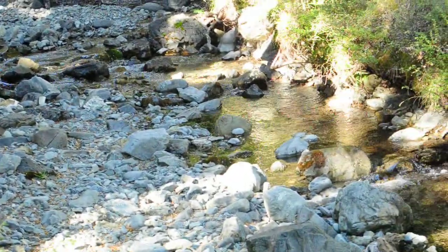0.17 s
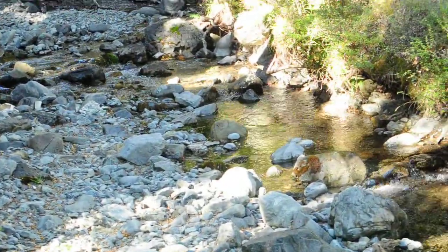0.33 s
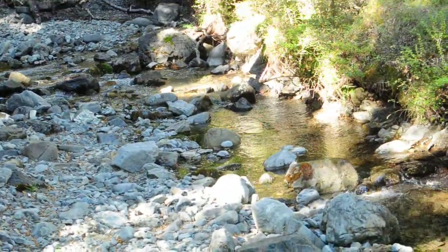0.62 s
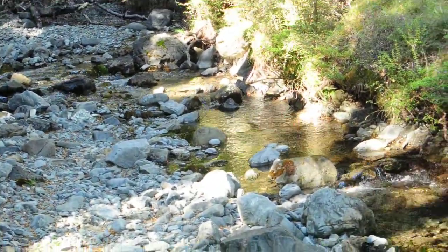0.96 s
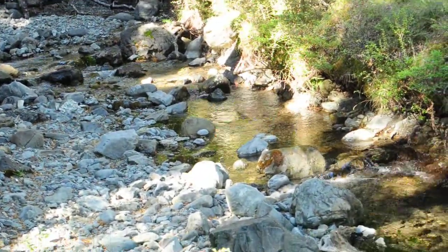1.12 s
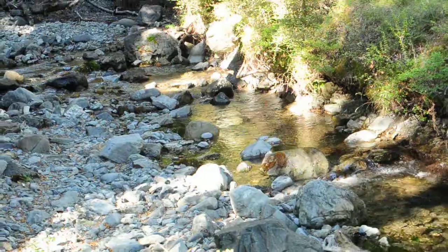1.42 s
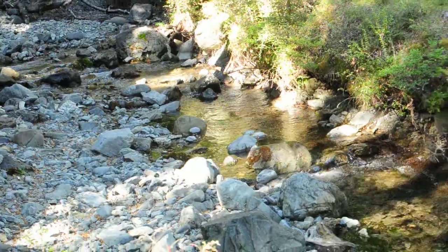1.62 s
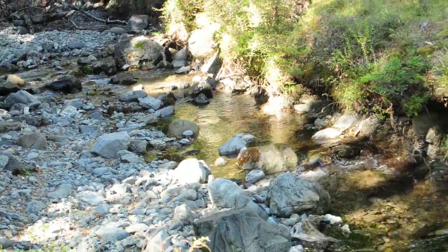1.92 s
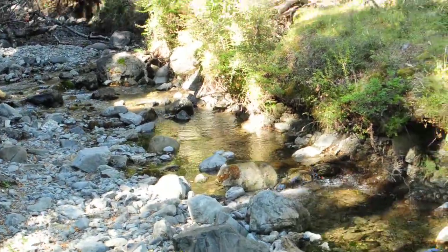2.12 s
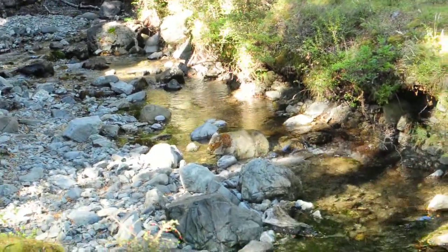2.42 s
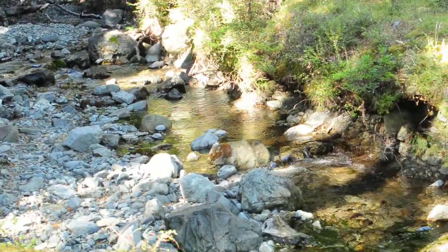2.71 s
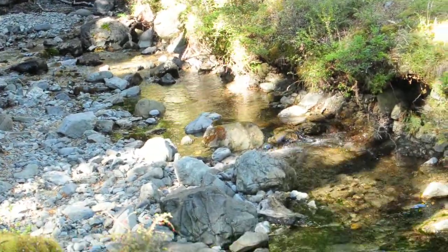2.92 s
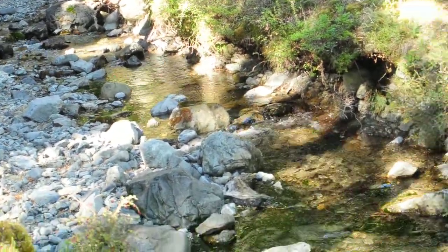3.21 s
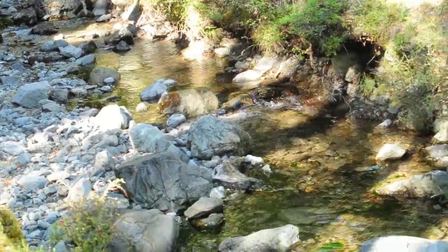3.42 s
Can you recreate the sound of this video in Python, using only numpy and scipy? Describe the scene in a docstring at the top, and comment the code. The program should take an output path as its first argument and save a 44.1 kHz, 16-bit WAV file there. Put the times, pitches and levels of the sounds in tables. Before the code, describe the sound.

Water babbles over rocks outdoors, bubbling and plopping, with a faint handling click midway.

```python
"""A shallow stream runs over stones, a few metres away, in the open air.
From the start, flickering bands of noise and swarms of tiny ringing bubbles merge into a rush.
Almost at once nearer drops plop and hollow pockets glug, as dying tones with short echoes.
Soon splashes swell the water round one pitch, and a first soft bump of the hand is felt.
Midway comes a second bump with one sharp plastic click, a ringing casing; a third bump follows."""
import sys
import numpy as np
from scipy import signal
from scipy.fft import rfft, irfft, next_fast_len
from scipy.io import wavfile

SR = 44100
rng = np.random.default_rng(int(sys.argv[2]) if len(sys.argv) > 2 else 0)


def output_pcm(signal):
    """Save a mono or channel-first signal as 16-bit PCM at the path in sys.argv[1].

    Samples are clipped to [-1, 1] before scaling.
    """
    pcm = np.clip(np.atleast_2d(signal).T, -1, 1) * 32767
    wavfile.write(sys.argv[1], SR, np.round(pcm).astype(np.int16))


N = 156996  # length of the scene in samples


def from_db(db):
    """Turn decibels into a plain multiplier."""
    return 10 ** (np.asarray(db) / 20)


def rms_one(x):
    """Scale to an average power of 1."""
    return x / np.sqrt(np.mean(x ** 2) + 1e-20)


def add(out, start_s, sound):
    """Mix a sound in, starting at a given time."""
    i = int(max(start_s, 0) * SR)
    out[i:i + len(sound)] += sound[:max(N - i, 0)]


def drift(corner_hz):
    """Random motion with a spread of 1; changes faster than the corner are smoothed away."""
    step = 40  # samples between the points of the curve
    r = np.exp(-2 * np.pi * corner_hz * step / SR)
    noise = rng.standard_normal(N // step + 2002)
    slow = signal.lfilter([1], [1, -2 * r, r * r], noise)[2000:]  # skip the filter's start
    return np.interp(np.arange(N) / step, np.arange(len(slow)), rms_one(slow))


def colour(x, points):
    """Filter to a given spectrum, never sounding ahead of time; white noise keeps its power."""
    size = next_fast_len(2 * N, True)
    hz, db = np.transpose(points)
    log_hz = np.log(np.fft.rfftfreq(size, 1 / SR) + 1)
    gain = rms_one(from_db(np.interp(log_hz, np.log(hz), db)))
    # folding the cepstrum forward in time gives the minimum-phase filter
    cepstrum = irfft(np.log(gain), size)
    cepstrum[1:size // 2] *= 2
    cepstrum[size // 2 + 1:] = 0
    return irfft(rfft(x, size) * np.exp(rfft(cepstrum)), size)[:N]


def ring(clicks, hz, t60):
    """A resonance: each unit click starts a sine of height 1 that fades by 60 dB in t60 seconds."""
    r, w = from_db(-60 / (t60 * SR)), 2 * np.pi * hz / SR
    return signal.lfilter([0, np.sin(w)], [1, -2 * r * np.cos(w), r * r], clicks + 1e-18)


def pulses(rows, rise, attack_cycles):
    """Single dying tones; over its life each glides in pitch by the fraction "rise"."""
    out = np.zeros(N)
    for start_s, hz, db, cycles in rows:
        age = np.arange(int(SR * cycles / hz)) * hz / SR  # in cycles
        attack = 1 - np.exp(-age / attack_cycles)
        decay = from_db(db - 60 * age / cycles)
        tone = np.sin(2 * np.pi * age * (1 + rise * age / cycles / 2))
        add(out, start_s, attack * decay * tone)
    return out


SURGE_DB, SURGE_HZ = 0.53, 74  # spread and corner of the flutter


def flow_db(hz, surge):
    """All pitches flutter together, and each splash lifts the pitches near its own."""
    return SURGE_DB * surge + splash_swell_db(hz)


RUSH_DB, RUSH_FLICKER_DB = -37.5, 1.0  # level before colouring, spread of the flicker
CLUMP_HZ = 31  # corner of the flicker, in the rush and in the bubble strengths


def rush(surge):
    """Far water: countless sounds blur into half-octave bands of noise, each with its own flicker."""
    edges = 20 * 2 ** np.arange(0, 10.1, .5)
    white = rng.standard_normal((2, N))  # neighbouring bands take different noise
    out = 0
    for k, (low, high) in enumerate(zip(edges, edges[1:])):
        sos = signal.butter(2, [low, high], "band", fs=SR, output="sos")
        band = signal.sosfilt(sos, white[k % 2])
        flicker_db = RUSH_FLICKER_DB * drift(CLUMP_HZ)
        out = out + band * from_db(flow_db(np.sqrt(low * high), surge) + flicker_db)
    return from_db(RUSH_DB) * rms_one(out)


LARGEST = 3.16  # cap on bubble strength, in spreads
CLUMP_DB = 1.75  # spread of the shared rise and fall in strength
BIRTH_CYCLES = 3.4  # length of a bubble's brief swell as it pinches off
BUBBLES_DB = 0.17  # lifts all the swarms against the rush
# swarms of bubbles: lowest f/Hz, highest f/Hz, births per s, cycles to fade by 60 dB,
# spread of strengths/dB, level/dB (per unit of bandwidth, before colouring)
BUBBLE_SWARMS = [(130, 691, 240, 8.8, 0.5, -39), (639, 1515, 400, 19.4, 1.5, -37),
                 (1413, 3360, 750, 24.4, 2.5, -36), (3376, 8650, 1700, 20.3, 3, -35),
                 (8440, 16400, 5300, 35, 4.5, -34)]


def swarm(surge, low_hz, high_hz, per_s, cycles, spread_db, level_db, count=24):
    """Air bubbles of random strength ring briefly, each at one of a set of pitches."""
    strength_db = spread_db * np.minimum(rng.exponential(1, N), LARGEST) + CLUMP_DB * drift(CLUMP_HZ)
    strengths = from_db(strength_db) * rng.choice([-1, 1], N)
    births = strengths * (rng.random(N) < per_s / SR)
    pitch_number = rng.integers(0, count, N)
    edges = np.geomspace(low_hz, high_hz, count + 1)
    out = 0
    for k, (low, width) in enumerate(zip(edges, np.diff(edges))):
        hz = low + width / 2
        tones = ring(births * (pitch_number == k), hz, cycles / hz)
        tones = ring(tones, hz, BIRTH_CYCLES / hz)  # the second ring softens the start
        out = out + np.sqrt(2 * width / SR) * rms_one(tones)  # power follows the width
    return out * from_db(level_db + BUBBLES_DB + flow_db(np.sqrt(low_hz * high_hz), surge))


# colour of the running water: f/Hz, relative level/dB
WATER_COLOUR = [(20, -20), (40, -27.5), (75, -23.5), (120, -22.5), (172, -17), (222, -17.5), (260, -12),
                (310, -5), (375, -8), (440, -8.5), (540, -11.5), (670, -8), (790, -3), (1000, -2.55),
                (1200, 0), (1550, -6), (2050, -3.5), (2500, -7), (2950, -8), (3900, -12.5), (6200, -15.5),
                (8000, -21.5), (10000, -31.5), (12500, -43), (15000, -52), (16000, -50)]


def running_water():
    """The rush and the bubble swarms share one flutter and one colour."""
    surge = drift(SURGE_HZ)
    bubbles = sum(swarm(surge, *row) for row in BUBBLE_SWARMS)
    return colour(rush(surge) + bubbles, WATER_COLOUR)


# near bubbles and drops, before echoes: t/s, f/Hz at the start, level/dB, cycles to fade by 60 dB
NEAR_PLOPS = [(.003, 770, -25, 20), (.215, 1260, -21.5, 27), (.317, 1240, -32, 20), (.351, 1660, -23, 19),
              (.391, 4100, -20, 12), (.5, 1020, -22, 16), (.542, 1230, -16.5, 25), (.618, 4100, -17, 10),
              (.677, 770, -30, 23), (.724, 4770, -17, 11), (.786, 1190, -23, 18), (.848, 2200, -18.5, 8),
              (.8883, 1770, -16, 16), (.8895, 1140, -18.5, 13), (1.0503, 3400, -9, 7.8),
              (1.196, 1270, -19.5, 26), (1.317, 2230, -23.5, 28), (1.369, 810, -21.5, 17),
              (1.389, 860, -23, 22), (1.525, 796, -22.5, 27), (1.587, 4800, -18, 11),
              (1.597, 1110, -21, 18), (1.795, 780, -39, 20), (1.818, 900, -36, 20), (1.903, 3500, -16, 10),
              (1.914, 1100, -27, 18), (2.0, 970, -25, 30), (2.158, 1150, -19.5, 14), (2.181, 1170, -25, 14),
              (2.2158, 1120, -13, 9.9), (2.2405, 2740, -13, 13), (2.287, 830, -22, 37),
              (2.311, 1010, -16, 18), (2.3195, 2900, -18, 11), (2.320, 960, -20, 15), (2.649, 784, -21, 18),
              (2.696, 5450, -11, 12), (2.699, 1250, -21.5, 25), (2.968, 2070, -16, 17),
              (3.008, 3000, -16, 11), (3.013, 1130, -17, 19), (3.041, 5860, -11.5, 16),
              (3.0685, 980, -16, 15), (3.085, 1220, -18, 22), (3.1118, 940, -12, 9), (3.131, 2070, -20, 37),
              (3.1955, 1250, -13.5, 22), (3.2045, 1810, -20, 9.8), (3.365, 1010, -19.5, 17),
              (3.389, 4870, -15, 12), (3.391, 1190, -20.5, 20), (3.542, 830, -26, 36)]


def plops():
    """Near bubbles and drops ring as short tones whose pitch creeps up."""
    return pulses(NEAR_PLOPS, rise=0.041, attack_cycles=0.38)


# hollow pockets between the rocks, before echoes:
# t/s, f/Hz at the start, level/dB, cycles to fade by 60 dB
ROCK_GLUGS = [(.045, 177, -42, 19), (.275, 330, -33, 12), (.715, 185, -37, 7), (1.22, 433, -30.5, 19),
              (1.362, 270, -27, 7), (1.365, 150, -35, 7.3), (1.53, 125, -43, 6.8), (1.907, 320, -33.5, 16),
              (2.638, 340, -29.5, 16), (2.788, 386, -29, 13), (2.855, 318, -32, 15),
              (3.009, 302, -25.5, 12), (3.108, 288, -20.5, 8.4), (3.128, 174, -31.5, 10),
              (3.17, 130, -35, 6.5), (3.255, 320, -30.5, 13), (3.28, 164, -38, 9.7), (3.39, 125, -39, 8),
              (3.462, 367, -31.5, 14)]


def glugs():
    """Pockets between the rocks give low, hollow tones that rise slightly."""
    return pulses(ROCK_GLUGS, rise=.05, attack_cycles=0.71)


SCATTER_DB, SCATTER_T60_S = -8, 0.054  # energy of the echoes against the direct sound, fade time


def scatter(x):
    """The direct sound and a short, noise-like spray of echoes off the stones and bank."""
    t = np.arange(SR // 10) / SR
    fade = from_db(-60 * t / SCATTER_T60_S)
    echoes = rng.standard_normal(len(t)) * fade * (t > .001)  # none in the first millisecond
    echoes = echoes / np.linalg.norm(echoes)
    return x + from_db(SCATTER_DB) * signal.fftconvolve(x, echoes)[:N]


NEAR_BAND_HZ = (113, 7200)


def near_water():
    """Plops and glugs with their echoes, kept to a middle range of pitch."""
    sos = signal.butter(2, NEAR_BAND_HZ, "band", fs=SR, output="sos")
    return signal.sosfilt(sos, scatter(plops() + glugs()))


SPLASH_OCTAVES = 0.86  # reach of a swell in pitch
# wavelets breaking on the stones: middle t/s, length/s, centre f/Hz, lift in level/dB
WAVELET_SPLASHES = [(.17, .11, 2300, 2.5), (.29, .12, 6500, 0.4), (0.369, 0.052, 1900, 4.5),
                    (0.852, .11, 1800, 3), (1.054, 0.1, 1810, 2), (1.372, .1, 4500, 2.5),
                    (1.413, .12, 900, 2), (1.6, 0.16, 1500, 1.5), (1.813, 0.094, 900, 4.5),
                    (1.91, 0.053, 1300, 3.5), (2.20, .13, 5000, 2.0), (2.225, 0.15, 1500, 2.0),
                    (2.41, .24, 7000, 2), (2.465, 0.11, 2000, 1.5), (2.738, 0.14, 1200, 3),
                    (2.848, 0.065, 1500, 3.5), (3.04, .15, 900, 4), (3.145, .15, 4500, 3),
                    (3.2, .5, 330, 2), (3.375, 0.065, 1000, 2.5), (3.387, 0.26, 6500, 1.8)]


def splash_swell_db(hz):
    """Breaking wavelets briefly lift the water, most at their own time and pitch."""
    t = np.arange(0, N, 200) / SR
    swell = 0
    for middle_s, length_s, centre_hz, db in WAVELET_SPLASHES:
        in_time = -(2 * (t - middle_s) / length_s) ** 2
        in_pitch = -.5 * (np.log2(hz / centre_hz) / SPLASH_OCTAVES) ** 2
        swell = swell + db * np.exp(in_time + in_pitch)
    return np.interp(np.arange(N) / SR, t, swell)


# dull bumps of the hand: t/s, f/Hz at the start, level/dB, cycles to fade by 60 dB
HAND_BUMPS = [(.375, 34.8, -45, 4.3), (1.954, 166, -27.5, 4.7), (2.34, 90, -41, 3.3)]


def bumps():
    """Soft knocks of the hand are low tones that die quickly and sag in pitch."""
    return pulses(HAND_BUMPS, rise=-0.18, attack_cycles=0.61)


CONTACT_HZ = (900, 5000)  # band that the contacts excite
RATTLE_DB, RATTLE_T60_S = -29, 0.02  # fine chatter after each contact, before the band filter
CRACK_DB = -8  # the bare contact, heard beside the ringing
# contacts within the click, before the band filter: t/s, level/dB
CLICK_CONTACTS = [(1.9832, -9), (1.9847, -9), (1.9863, -4), (1.9895, -10.5)]
# resonances of the plastic casing: f/Hz, level/dB, time to fade by 60 dB/s
CASING_MODES = [(1550, -13.5, .016), (2660, -14.5, .018), (3000, -8, 0.024), (3660, -7, 0.012),
                (4400, -8.5, 0.0048), (5360, -15, 0.0091), (6530, -13.5, 0.0073), (7880, -13.5, 0.0089),
                (11130, -26, .009)]


def plastic_click():
    """A quick run of contacts, each with a little chatter, sets a plastic casing ringing."""
    contacts, t = np.zeros(N), np.arange(SR // 25) / SR
    for start_s, db in CLICK_CONTACTS:
        chatter = rng.standard_normal(len(t)) * from_db(RATTLE_DB - 60 * t / RATTLE_T60_S)
        add(contacts, start_s, from_db(db) * ((t == 0) + chatter))
    sos = signal.butter(1, CONTACT_HZ, "band", fs=SR, output="sos")
    contacts = signal.sosfilt(sos, contacts)
    ringing = 0
    for k, (hz, db, t60) in enumerate(CASING_MODES):
        ringing = ringing + (-1) ** k * ring(contacts, hz, t60) * from_db(db)  # alternating sign
    return ringing + from_db(CRACK_DB) * contacts


def scene():
    """The running water, its near plops and glugs, the bumps and the click."""
    return (running_water() + near_water() + bumps() + plastic_click())[None]


def record(dry):
    """The treble is cut steeply above 15500 Hz."""
    return signal.sosfilt(signal.ellip(12, .1, 90, 15500, fs=SR, output="sos"), dry)


dry = scene()
out = record(dry)
output_pcm(out)
```